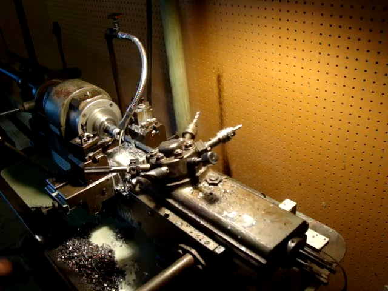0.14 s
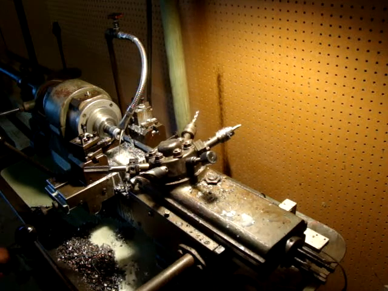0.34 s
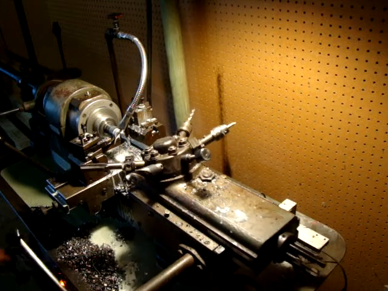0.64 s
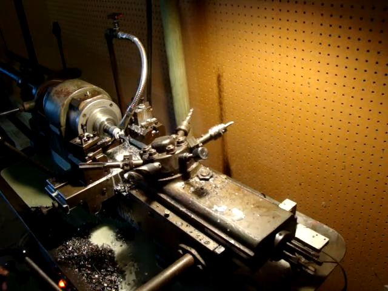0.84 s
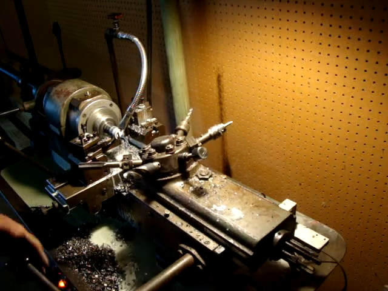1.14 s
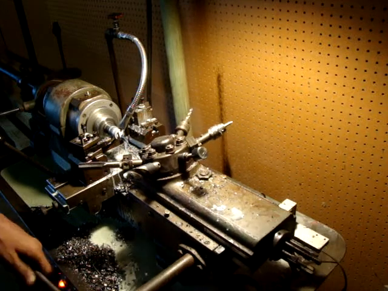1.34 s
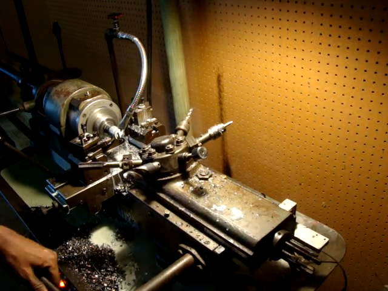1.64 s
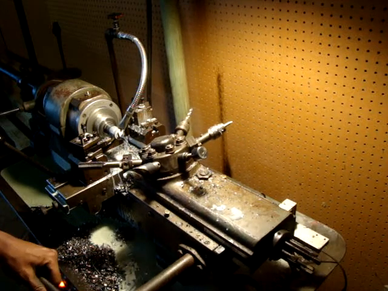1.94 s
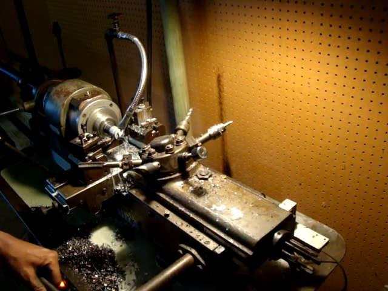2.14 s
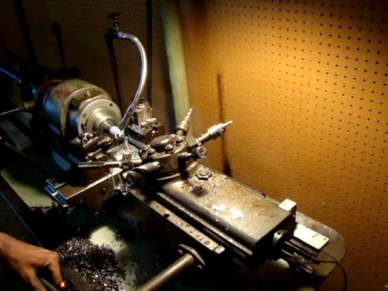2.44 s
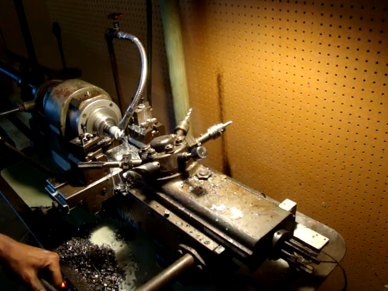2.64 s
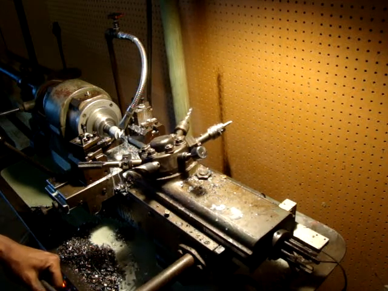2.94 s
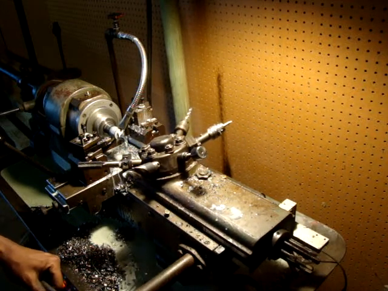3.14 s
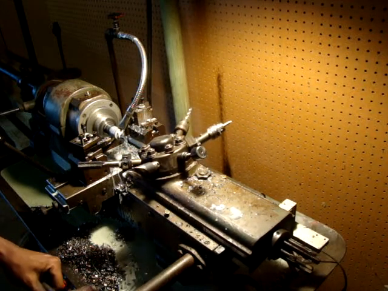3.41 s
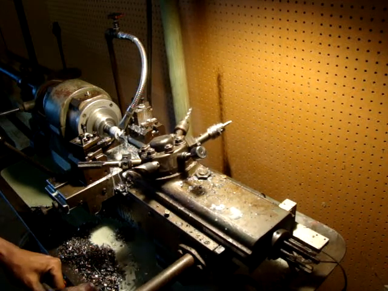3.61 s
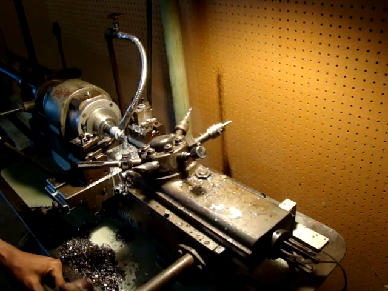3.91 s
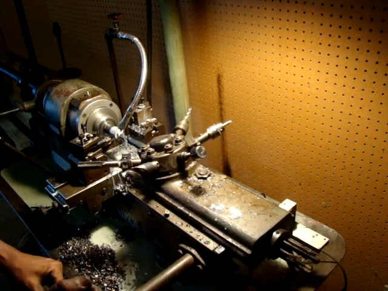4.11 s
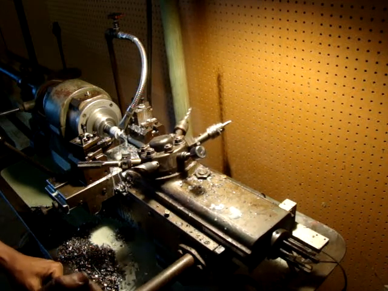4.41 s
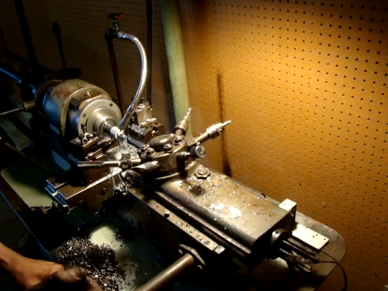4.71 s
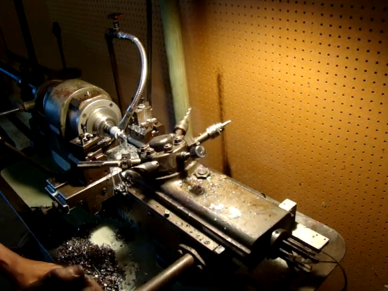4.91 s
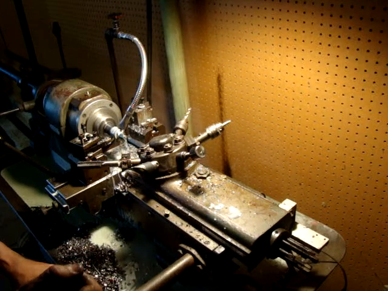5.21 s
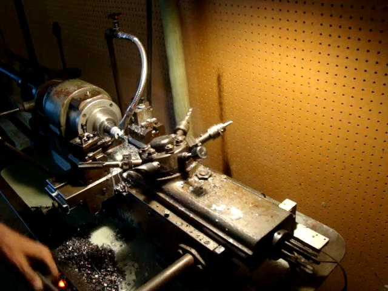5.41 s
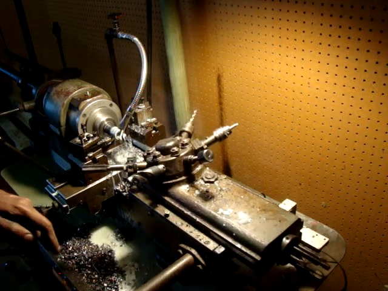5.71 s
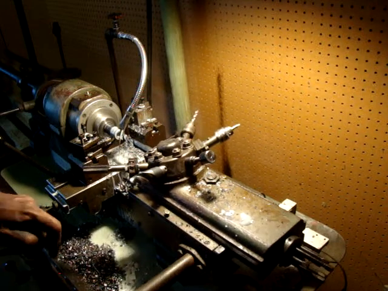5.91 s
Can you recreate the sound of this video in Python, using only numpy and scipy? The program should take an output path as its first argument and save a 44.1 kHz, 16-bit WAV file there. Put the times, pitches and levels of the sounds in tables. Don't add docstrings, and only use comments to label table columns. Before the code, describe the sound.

A small metal lathe hums and whines, its turret knocks sharply into place, then a drill squeals, bites and tears noisily through steel.

```python
import sys
import numpy as np
from scipy import signal
from scipy.fft import rfft, irfft
from scipy.io import wavfile
from scipy.ndimage import uniform_filter1d, minimum_filter1d

SR = 44100
rng = np.random.default_rng(int(sys.argv[2]) if len(sys.argv) > 2 else 0)


def bounce(signal):
    frames = np.transpose(np.atleast_2d(signal))
    limited = np.clip(frames, -1, 1)
    pcm = np.round(limited * 32767).astype(np.int16)
    wavfile.write(sys.argv[1], SR, pcm)


def to_linear_factor(level_db):
    exponent = np.asarray(level_db, float) / 20
    return 10 ** exponent


N = 267246

BAND_TOP_HZ = 10180
TOUCH_S, BITE_S, BACK_OUT_S, CLEAR_S = 1.59, 1.9, 5.25, 5.46


def rms_one(x):
    return x / np.sqrt(np.mean(x ** 2) + 1e-20)


def in_time(rows):
    s, *columns = np.transpose(rows)
    return [np.interp(np.arange(N) / SR, s, c) for c in columns]


def during(rows, fade_s=0.013):
    t = np.arange(N) / SR
    return np.clip(np.minimum(t - rows[0][0], rows[-1][0] - t) / fade_s, 0, 1)


def ramp(start_s, length_s):
    return np.clip((np.arange(N) / SR - start_s) / length_s, 0, 1)


def bump(middle_s, width_s):
    return np.exp(-.5 * ((np.arange(N) / SR - middle_s) / width_s) ** 2)


def drift(rate_hz):
    r = np.exp(-80 * np.pi * rate_hz / SR)
    noise = rng.standard_normal(N // 40 + 2002)
    slow = signal.lfilter([1], [1, -2 * r, r * r], noise)[2000:]
    return np.interp(np.arange(N) / 40, np.arange(len(slow)), rms_one(slow))


def band(x, low_hz, high_hz):
    sos = signal.butter(2, [low_hz, min(high_hz, .45 * SR)], "band", fs=SR, output="sos")
    return signal.sosfilt(sos, x)


def resonate(x, modes):
    out = 0
    for k, (hz, width_hz, level_db) in enumerate(modes):
        r = np.exp(-np.pi * width_hz / SR)
        ring = signal.lfilter([1, 0, -1], [1, -2 * r * np.cos(2 * np.pi * hz / SR), r * r], x)
        out = out + (-1) ** k * to_linear_factor(level_db) * rms_one(ring)
    return out


def grains(per_s, spread_db):
    sizes = to_linear_factor(spread_db * np.minimum(rng.exponential(1, N), 5)) * rng.choice([-1, 1], N)
    return rms_one(sizes * (rng.random(N) < per_s / SR))


def bank(sources, spectrum, patchy_db, shift_db):
    out, together = 0, drift(6.1)
    edges = 22 * 2 ** np.arange(0, 9.1, 1 / 3)
    hz_points, db_points = np.transpose(spectrum)
    for k, (low, high) in enumerate(zip(edges, edges[1:])):
        hz = np.sqrt(low * high)
        level_db = np.interp(np.log(min(hz, BAND_TOP_HZ - 600)), np.log(hz_points), db_points) + shift_db(hz)
        flicker_db = patchy_db * (0.72 * together + drift(11.6))
        out = out + to_linear_factor(level_db + flicker_db) * band(sources[k % 2], low, high)
    return out


def load():
    rise_s = .2
    return ramp(BITE_S - .5 * rise_s, rise_s) * (1 - ramp(BACK_OUT_S, CLEAR_S - BACK_OUT_S))


# (multiple of spindle turn, level [dB])
WHINE_SIDE_TONES = [(15, -10.5), (17, -9.5), (15.4, -10.5), (16.45, -13), (17.6, -18)]
# (time [s], level [dB])
WHINE_SWELL = [(0, -47), (.25, -33), (.7, -31.5), (1.85, -31), (2.35, -26.5), (2.9, -30), (3.15, -30),
               (3.45, -30.5), (4.6, -29), (5.3, -29.5), (5.5, -32.5), (6.06, -29)]


def spindle():
    idle_turns_per_s, sag_turns_per_s, creep_turns_per_s = 35.65, .4, .15
    loaded_db, unloaded_db, let_go_db = -34, -53.5, 4
    biting = ramp(BITE_S, .13) * (1 - ramp(CLEAR_S - .08, .1))
    load_db = unloaded_db + (loaded_db - unloaded_db) * biting + let_go_db * bump(BACK_OUT_S + .06, 0.053)

    speed = idle_turns_per_s - load() * (sag_turns_per_s + creep_turns_per_s * ramp(BITE_S, 1.3))
    dragged = np.clip((speed[0] - speed) / .2, 0, 1)
    turns = np.cumsum(speed * (1 + 0.00082 * drift(9.4))) / SR

    main = to_linear_factor(2.05 * drift(30.0)) * np.sin(2 * np.pi * 16 * turns)
    sides = 0
    for multiple, db in WHINE_SIDE_TONES:
        tone = np.sin(2 * np.pi * (multiple * turns + rng.random()))
        sides = sides + to_linear_factor(db + 1.9 * drift(3.4)) * tone
    loaded = to_linear_factor(3 * drift(9.0)) * np.sin(2 * np.pi * 24 * turns + .6 * drift(5.0))
    whine = to_linear_factor(in_time(WHINE_SWELL)[0]) * (main + to_linear_factor(0.055 * (load_db + 34.5)) * sides)
    return np.sqrt(2) * (whine + to_linear_factor(load_db) * dragged * loaded)


# (frequency [Hz], level [dB rms])
MOTOR_TONES = [(60, -66), (120, -57), (200, -52), (249, -48), (294.5, -47), (404, -49), (677, -45),
               (727, -46), (1028, -50), (1087, -50), (1134, -51), (1344, -49), (2144, -48), (2291, -50),
               (2336, -50), (3820, -52)]
# (frequency [Hz], density [dB per Hz])
RUMBLE_COLOUR = [(25, -51), (70, -31), (150, -24), (240, -17.5), (450, -12.5), (570, -14.5), (780, -9.5),
                 (1000, -17), (1900, -20), (2300, -17), (2700, -24.5), (3400, -18), (5300, -28.5),
                 (10000, -35)]
# (frequency [Hz], width [Hz], level [dB])
BELT_MODES = [(3230, 180, -3), (3330, 81, 0), (3580, 260, 2), (3930, 91, -15)]


def motor():
    level_db = -29 - load()
    belt_lap_s, belt_first_s, belt_db = .1705, .015, -41.5
    fan_flutter_hz, fan_first_s, fan_low_hz, fan_db = 15.9, .05, 7500, -46
    t = np.arange(N) / SR

    noise = rng.standard_normal((2, N))
    rumble = rms_one(bank(noise, RUMBLE_COLOUR, patchy_db=1.34, shift_db=lambda hz: 0))
    hum = 0
    for hz, db in MOTOR_TONES:
        hum = hum + to_linear_factor(db + 1.7 * drift(8.1)) * np.sin(2 * np.pi * (hz * t + rng.random()))

    lap = to_linear_factor(5.5 * np.cos(2 * np.pi * (t - belt_first_s) / belt_lap_s) + .8 * drift(12.0))
    belt = to_linear_factor(belt_db) * lap * rms_one(resonate(rng.standard_normal(N), BELT_MODES))

    blade_phase = 2 * np.pi * fan_flutter_hz * (t - fan_first_s) + .7 * drift(3.0)
    flutter = to_linear_factor(4.5 * np.cos(blade_phase) + 2.0 * drift(9.0))
    fan = to_linear_factor(fan_db) * flutter * rms_one(band(rng.standard_normal(N), fan_low_hz, 1.4 * fan_low_hz))
    return to_linear_factor(level_db) * rumble + to_linear_factor(level_db + 29.5) * (np.sqrt(2) * hum + belt + fan)


# (time [s], ring level [dB], rattle length [s], crash level [dB], crash top [Hz])
TURRET_KNOCKS = [
    (.074, -20.5, 0.045, -19.5, 5350),
    (0.256, -17, .01, -20.5, 8950),
    (0.294, -18.5, 0.044, -16.5, 3900),
]
KNOCK_RISES = [0.026, .003, 0.007]
# (frequency [Hz], level [dB], T60 [s])
RELEASE_MODES = [(137, -10.5, 0.98), (203, -14, 0.71), (510, -1, 0.54), (740, 1.5, 0.39), (856, 7.5, 0.32),
                 (1010, -5, 0.26), (1063, -0.5, 0.18), (1545, -1.5, .2), (1880, -5, .1), (2520, -9, 0.12),
                 (2860, -11, .1)]
# (frequency [Hz], level [dB], T60 [s])
PAWL_MODES = [(1239, -0.5, 0.36), (1420, 2.5, 0.13), (1500, 3, 0.11), (1650, -6, .1), (5200, -4, 0.072),
              (6891, -22.5, 0.067)]
# (frequency [Hz], level [dB], T60 [s])
LOCK_MODES = [(131, -18.5, 0.54), (195, -6, 0.19), (637, 4, 0.34), (681, 1.5, 0.13), (719, 4.5, 0.11),
              (840, -6, 0.24), (927, 1.5, .3), (980, 0, 0.27), (1486, -12, 0.28), (1780, -4, .2),
              (2094, -4, 0.36), (2280, -3.5, .2), (2525, -9, 0.24), (2830, -1, 0.13), (2995, 1, 0.099)]


def turret():
    shop_t60_s = .5
    out, size = np.zeros(N), SR // 2
    t, hz = np.arange(size) / SR, np.fft.rfftfreq(size, 1 / SR) + 1
    mode_sets = (RELEASE_MODES, PAWL_MODES, LOCK_MODES)
    for knock, rise_s, modes in zip(TURRET_KNOCKS, KNOCK_RISES, mode_sets):
        s, ring_db, rattle_s, crash_db, top_hz = knock
        push = np.clip(t / rise_s + 0.4, 0, 1) / (1 + (t / rattle_s) ** 3.2)
        ring = 0
        for mode_hz, level_db, t60 in modes:
            r, w = to_linear_factor(-60 / (t60 * SR)), 2 * np.pi * mode_hz / SR
            contacts = push * rng.standard_normal(size)
            mode = signal.lfilter([0, np.sin(w)], [1, -2 * r * np.cos(w), r * r], contacts)
            ring = ring + to_linear_factor(level_db) * mode / np.abs(mode).max()

        colour = 1 / (1 + (hz / top_hz) ** 4.0) + .12
        colour = colour / (1 + (450 / hz) ** 3) * (hz / 1000) ** -.2
        decay_db = -60 * np.maximum(t - 0.62 * rattle_s, 0) / shop_t60_s * (0.62 + 0.014 / rattle_s)
        swell = np.clip(t / rise_s + 0.45, 0, 1) * to_linear_factor(decay_db)
        crash = swell * rms_one(irfft(rfft(rng.standard_normal(size)) * colour, size))
        at = round(s * SR)
        out[at:at + size] += to_linear_factor(ring_db) * ring + to_linear_factor(crash_db) * crash
    return out


# (time [s], pressure [dB], depth [0-1])
FEED_LEVER = [
    (1.57, -17, 0),
    (1.72, -8.5, 0.7),
    (1.97, 0, 0.3),
    (2.98, -0.5, .2),
    (3.2, .5, 0.56),
    (4.0, 1.5, 1),
    (4.55, -.5, 0.91),
    (5.2, -1, 0.98),
    (5.46, -8, 0.6),
]
# (shallow level [dB], gain at full depth [dB], share of pressure)
MACHINE_PARTS = [
    (5.5, -6.5, 1.35),
    (-0.5, 4, 1.3),
    (1.5, 2, 0.49),
    (3.5, -4, 0.9),
]
PART_HZ = [330, 1350, 3600, 7400]
# (time [s], level [dB])
FLUTE_THROBS = [(1.978, 3), (2.712, 4.5), (3.06, 1.5), (3.2, -0.5), (3.267, 4.5), (3.408, 4), (3.542, 2),
                (3.665, 5), (3.81, 5), (3.944, 5.5), (4.077, 7), (4.234, 3.5), (4.444, 1.5), (4.646, 6.5),
                (4.718, 6), (4.787, 4.5), (4.947, 6), (5.173, 2.5)]
# (frequency [Hz], density [dB per Hz])
TEARING_COLOUR = [(88, -58), (150, -65), (287, -7), (460, -13.5), (580, -17), (850, -11), (1300, -11),
                  (1700, -11), (2200, -16), (2750, -22), (3500, -18), (5600, -17), (10000, -21)]
# (frequency [Hz], width [Hz], level [dB])
HEADSTOCK_MODES = [(296.6, 7.3, -3.5), (563, 75, -1.5), (598.3, 12, -2), (685, 37, -8), (749, 7.1, 1.5),
                   (765, 24, -5), (936, 14, -4.5), (962, 7.9, -9.5), (1084, 44, -6.5), (1065, 20, -4),
                   (1448, 40, 0), (1525, 15, -19), (1740, 77, -13.5), (1897, 14, -8.5), (2314, 71, -1.5),
                   (3350, 240, 2.5), (5940, 60, -19.5)]


def cutting():
    pressure_db, depth = in_time(FEED_LEVER)
    parts_db = np.array([db + deep_db * depth + share * pressure_db for db, deep_db, share in MACHINE_PARTS])
    parts_db[0] += -5 * (1 - ramp(BITE_S, .03))
    throb_db = sum(db * bump(s, 0.016) for s, db in FLUTE_THROBS)
    parts_db[1:3] += throb_db * np.array([[1], [.8]])

    def swell_db(hz):
        place = np.interp(np.log(hz), np.log(PART_HZ), np.arange(4))
        k = min(int(place), 2)
        return (1 - place + k) * parts_db[k] + (place - k) * parts_db[k + 1]

    tearing = np.array([grains(9000., spread_db=3.5) for _ in range(2)])
    broad = to_linear_factor(17.5) * bank(tearing, TEARING_COLOUR, patchy_db=1.5, shift_db=swell_db)
    rings = sum(to_linear_factor(swell_db(mode[0]) - 40.5) * resonate(tearing[0], [mode]) for mode in HEADSTOCK_MODES)
    return during(FEED_LEVER) * (to_linear_factor(-27) * broad + rings)


# (frequency [Hz], width [Hz], level [dB])
TOUCH_MODES = [(2310, 95, 1), (3250, 200, -5), (4950, 200, -5), (5950, 400, -4), (6850, 400, -7)]
# (frequency [Hz], width [Hz], level [dB])
DEEP_TIP_MODES = [(5430, 470, 7), (4680, 66, -3), (5890, 200, 0.5)]


def rubbing():
    slips = grains(3000., spread_db=4.5)
    grow_db = 3 * ramp(TOUCH_S, BITE_S - TOUCH_S)
    fade_db = -20 * ramp(BITE_S, 0.102) - 40 * ramp(BITE_S + .2, .5)
    rub = ramp(TOUCH_S, .03) * to_linear_factor(grow_db + fade_db)
    touch = rub * to_linear_factor(-36 + 0.76 * drift(30.0)) * resonate(slips, TOUCH_MODES)

    pull_out_db = 8 * bump(CLEAR_S - .09, 0.041)
    tip_db = -45.5 + 7.5 * bump(4.36, 0.18) + pull_out_db
    deep = in_time(FEED_LEVER)[1] * during(FEED_LEVER) * to_linear_factor(tip_db)
    return touch + deep * to_linear_factor(0.72 * drift(11.0)) * resonate(slips, DEEP_TIP_MODES)


# (time [s], level [dB rms], length [s], centre [Hz])
CHIP_BREAKS = [(2.027, -30, 0.088, 7650), (2.102, -27, 0.019, 8100), (2.186, -25, 0.016, 7060),
               (2.208, -25.5, .03, 8600), (2.254, -28.5, .03, 8500), (2.237, -22.5, 0.031, 5850),
               (2.347, -36, 0.02, 8600), (2.416, -24.5, 0.01, 9000), (2.455, -23, 0.024, 7500),
               (2.668, -27, 0.014, 8500), (2.684, -23, 0.031, 8000), (2.83, -26, .02, 6500),
               (2.786, -25, 0.055, 8360), (3.044, -30, 0.048, 7740), (3.2, -23, 0.031, 6900),
               (3.292, -25.5, 0.019, 6950), (3.344, -27.5, 0.019, 6500), (3.634, -26, 0.012, 6500),
               (3.683, -22, 0.024, 6500), (4.64, -32, 0.012, 3500), (4.699, -26, 0.025, 5550)]


def chips():
    out = np.zeros(N)
    crackle = grains(9000., spread_db=2.0) * to_linear_factor(3 * drift(110.0))
    t = np.arange(round(.2 * SR)) / SR
    thud = np.sin(2 * np.pi * 45 * t) * np.exp(-t / 0.011)
    for s, level_db, length_s, hz in CHIP_BREAKS:
        at = round(s * SR)
        shape = np.clip(t / 0.0055, 0, 1) / (1 + (t / length_s) ** 3.4)
        bright = crackle[at:at + len(t)]
        for _ in range(2):
            bright = band(bright, hz / 1.43, hz * 1.3)
        snap = to_linear_factor(-8.5) * rms_one(shape * bright) * np.sqrt(length_s / 0.033)
        out[at:at + len(t)] += to_linear_factor(level_db) * (snap + to_linear_factor(-23) * thud)
    return out


def scene():
    mono = spindle() + motor() + turret() + cutting() + rubbing() + chips()
    return np.array([mono, mono])


def starved_bands(x, margin_db=7.0, chance_db=2.0):
    hz, _, frames = signal.stft(x, SR, nperseg=512)
    edges = np.searchsorted(hz, np.arange(4950, 10600, 600))
    luck = rng.standard_normal((len(edges) + 1, frames.shape[1]))
    luck = 0.93 * luck[1:] + 0.29 * luck[0]
    luck = np.sqrt(2) * uniform_filter1d(luck, size=2, axis=1)
    loud_db = 10 * np.log10(np.mean(np.abs(frames[:edges[0]]) ** 2, axis=0) + 1e-20)
    for k, (low, high) in enumerate(zip(edges, edges[1:])):
        level_db = 10 * np.log10(np.mean(np.abs(frames[low:high]) ** 2, axis=0) + 1e-20)
        nearby_db = -minimum_filter1d(-level_db, size=7)
        need_db = nearby_db - level_db + .42 * (loud_db - level_db - 15.5) + 0.042 * k * k
        frames[low:high, need_db + chance_db * luck[k] > margin_db] *= .01
    return signal.istft(frames, SR, nperseg=512)[1][:N]


def roll_off(x):
    return signal.sosfilt(signal.butter(12, 11170, fs=SR, output="sos"), x)


def record(dry):
    top = .85
    rounded = top * np.tanh(dry[0] / top)
    mono = signal.sosfilt(signal.butter(1, 40., "high", fs=SR, output="sos"), rounded)
    band_end = signal.ellip(14, .5, 75, BAND_TOP_HZ, fs=SR, output="sos")
    narrow = signal.sosfilt(band_end, starved_bands(mono))
    return roll_off(np.array([narrow, narrow]))


dry = scene()
out = record(dry)
bounce(out)
```